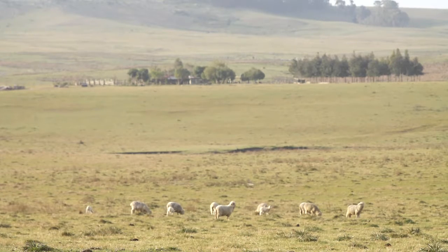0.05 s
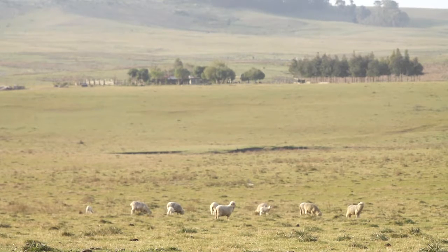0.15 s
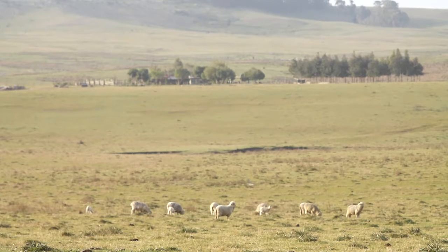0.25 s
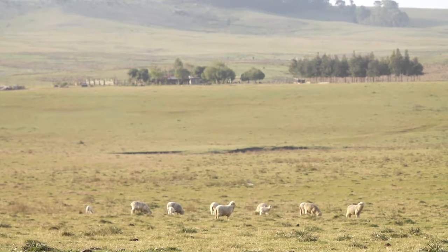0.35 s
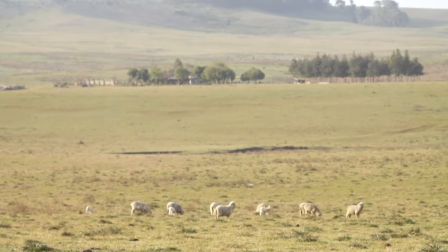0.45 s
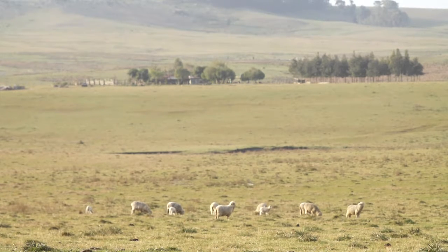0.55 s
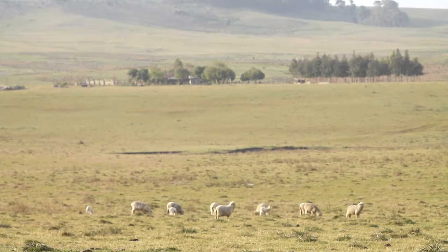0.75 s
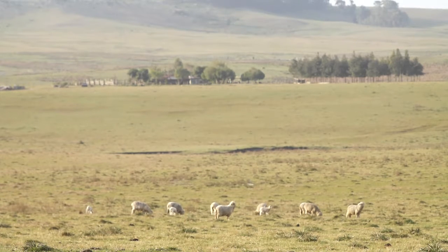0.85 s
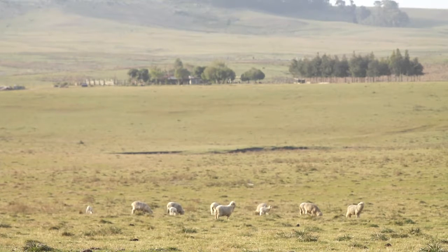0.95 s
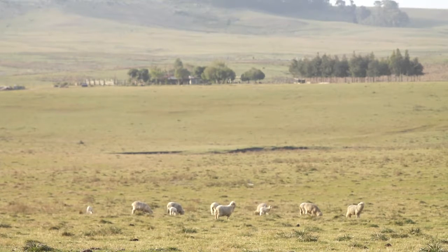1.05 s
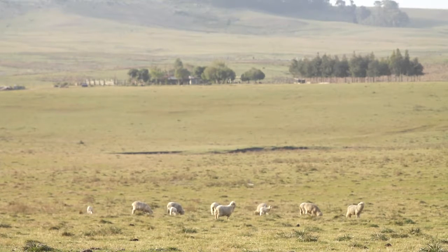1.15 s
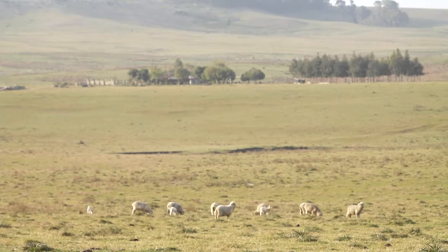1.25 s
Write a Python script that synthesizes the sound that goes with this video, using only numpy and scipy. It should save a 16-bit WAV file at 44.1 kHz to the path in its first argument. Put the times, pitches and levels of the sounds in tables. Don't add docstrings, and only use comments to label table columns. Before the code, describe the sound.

A small fly's low buzz swells quickly at the left microphone, thumps it with air, brushes the grille and vanishes; uneven wind rumble, faint plastic ticks and hiss continue on an open pasture.

```python
import sys
import numpy as np
from scipy import signal
from scipy.fft import rfft, irfft
from scipy.io import wavfile

SR = 44100
rng = np.random.default_rng(int(sys.argv[2]) if len(sys.argv) > 2 else 0)


def store_wav(level_fs):
    pcm = np.round(np.clip(np.atleast_2d(level_fs), -1, 1) * 32767)
    wavfile.write(sys.argv[1], SR, pcm.T.astype(np.int16))


def invert_db(level):
    return 10 ** (np.asarray(level, dtype=float) / 20)


N = 57330


def evened(x):
    return x / np.sqrt(np.mean(x ** 2) + 1e-20)


def shaped(x, points):
    f, db = np.transpose(points)
    hz = np.fft.rfftfreq(x.shape[-1], 1 / SR)
    gain_db = np.interp(np.log(hz + 1), np.log(f), db)
    return irfft(rfft(x) * invert_db(gain_db), x.shape[-1])


def slow(hz, channels=1):
    x = shaped(rng.standard_normal((channels, N)), [(1, 0), (hz, 0), (2 * hz, -60)])
    return x / x.std(1, keepdims=True)


def band(x, hz, width):
    b, a = signal.iirpeak(hz, hz / width, SR)
    return signal.lfilter(b, a, signal.lfilter(b, a, x))


def panned(x, pan_db):
    return np.array([x * invert_db(pan_db / 2), x * invert_db(-pan_db / 2)])


def bump(s, length):
    return np.exp(-.5 * ((np.arange(N) / SR - s) / length) ** 2)


# t/s, level/dB, left over right/dB
GUST_LEVELS = [
    (0, -54, -5),
    (.12, -43.5, 1),
    (.22, -50.5, -1),
    (.36, -40.5, -2),
    (.5, -39, -0.5),
    (.62, -44.5, -11),
    (.8, -39, -4),
    (1.0, -48, -6),
    (1.15, -47.5, 0.5),
    (1.3, -52.5, -9),
]
# f/Hz, level/dB
RUMBLE_SPECTRUM = [(10, -2.5), (22, 2), (40, -3), (63, -11.5), (110, -25.5), (155, -28), (300, -33),
                   (600, -59)]
# f/Hz, level/dB
ROAR_SPECTRUM = [(40, -9.5), (100, 8.5), (200, -8), (400, -12), (800, -19.5), (1600, -20), (3500, -31.5),
                 (9000, -36.5)]
# t/s, length/s, peak level/dB, swing f/Hz, port (0 left, 1 right)
EDDY_HITS = [(0.117, 0.014, -31.5, 29.2, 1), (0.396, 0.0086, -25.5, 39, 1), (0.445, 0.026, -21, 31.9, 1),
             (0.534, 0.019, -23, 24.4, 1), (0.697, 0.023, -30, 37.3, 1), (0.766, 0.024, -24.5, 27, 1),
             (0.827, 0.0079, -21, 44.3, 1), (0.888, 0.0046, -26.5, 50, 1), (0.916, 0.0067, -18, 38.6, 1),
             (1.006, 0.015, -24.5, 40.7, 1), (1.067, 0.014, -25.5, 39.2, 1), (0.425, 0.02, -25, 30.6, 0),
             (0.526, 0.017, -37, 26, 0), (0.677, 0.01, -30.5, 30.8, 0), (0.799, 0.027, -35, 32.2, 0),
             (0.867, 0.014, -36.5, 34.2, 0), (0.952, 0.012, -27, 44.7, 0), (1.127, 0.027, -35, 41.6, 0),
             (0.946, 0.0054, -32, 75, 1), (1.001, 0.006, -35.5, 94, 0), (1.047, 0.0075, -35.5, 70, 0),
             (1.169, 0.014, -39, 49, 0), (1.228, 0.017, -41, 40.5, 0), (.642, .012, -33.5, 39.5, 0)]
# t/s, length/s, level/dB, centre f/Hz, left over right/dB
RUSTLE_EVENTS = [
    (.578, .004, -56, 300, 10),
    (.612, .006, -51, 380, 10),
    (.664, .008, -54, 2400, -2),
    (.71, .025, -54, 600, -1),
    (.68, .03, -58, 350, -1),
    (.40, .04, -59, 500, 0),
    (.53, .04, -60, 350, -2),
    (.12, .05, -60, 1300, 0),
    (1.24, .025, -54, 500, -2),
    (1.25, .02, -57, 1400, -2),
]
LUMPS_DB = 1
ROAR_DB, ROAR_FOLLOWS = -51.5, 0.2
RUSTLE_DB = -0.9


def wind():
    t = np.arange(N) / SR
    gust_s, gust_db, gust_pan_db = np.transpose(GUST_LEVELS)
    db, pan_db = np.interp(t, gust_s, gust_db), np.interp(t, gust_s, gust_pan_db)
    rumble_noise, roar_noise, rustle_noise = rng.standard_normal((3, 2, N))

    lumpy = rumble_noise * invert_db(LUMPS_DB * slow(40, channels=2))
    out = evened(shaped(lumpy, RUMBLE_SPECTRUM)) * panned(invert_db(db + 4.0), pan_db)
    for s, length, peak_db, hz, port in EDDY_HITS:
        out[round(port)] -= invert_db(peak_db) * bump(s, length) * np.cos(2 * np.pi * hz * (t - s))

    roar = evened(shaped(roar_noise + 0.19 * roar_noise[::-1], ROAR_SPECTRUM))
    out += roar * invert_db(ROAR_DB + ROAR_FOLLOWS * (db + 40) + 1.5 * slow(9))

    for s, length, level_db, hz, side_db in RUSTLE_EVENTS:
        rustle = band(rustle_noise, hz, 1.37 * hz) * bump(s, length)
        rustle *= np.sqrt(length * SR * 1.8 / (rustle ** 2).sum(1, keepdims=True))
        out += rustle * panned(invert_db(level_db + RUSTLE_DB) * np.ones(1), side_db)
    return out


# t/s, then snap, low ring, high ring and boom level/dB
TICK_EVENTS = [(.1016, -45, -51, -46.5, -37.5), (0.1123, -50.5, -60, -58, -55), (.1243, -69, -58, -68, -70),
               (.1443, -66, -51, -63, -70), (.236, -44.5, -46, -50, -31), (0.298, -60, -47, -66, -44),
               (.358, -68, -53.5, -66, -42.5), (.399, -68, -54, -66, -46.5),
               (.6552, -41.5, -50.5, -45, -57), (0.6587, -50.5, -57, -49, -70),
               (0.6639, -48, -45.5, -58, -51), (.681, -61, -58, -66, -68), (0.6986, -53, -55, -53, -53),
               (.7025, -58, -49, -62, -70), (.711, -62, -62, -66, -70), (.721, -61, -55, -62, -65),
               (.738, -64, -56.5, -64, -68)]
# f/Hz, level/dB
SNAP_SPECTRUM = [(300, -16), (1200, 9), (2800, 0.5), (6000, -9), (13000, -7), (15600, -5)]
# f/Hz, level/dB, T60/s
LOW_MODES = [(1420, -1, .11), (1465, -5, .06), (1330, -6, .03), (1800, -7, .04), (2010, -7, .04),
             (684, -2, .05), (950, -7, .03)]
# f/Hz, level/dB, T60/s
HIGH_MODES = [(2550, -6, .02), (3150, -1, .014), (3900, -7, .01), (4850, 0, .012), (7300, -6, .01)]
SNAP_T60, BOOM_T60, BOOM_HZ = 0.021, 0.23, 124.2
DETUNE = .008
TICK_PAN_DB, TICK_SAME = -2.2, .7


def housing():
    length = 12000
    out, t = np.zeros((2, N + length)), np.arange(length) / SR
    for s, snap_db, low_db, high_db, boom_db in TICK_EVENTS:
        noise = rng.standard_normal((2, length))
        snap = shaped(noise + TICK_SAME * noise[::-1], SNAP_SPECTRUM) * invert_db(-60 * t / SNAP_T60)
        snap *= invert_db(snap_db) / snap[:, :100].std(1, keepdims=True)

        ring = np.zeros((2, length))
        for level_db, modes in [(low_db, LOW_MODES), (high_db, HIGH_MODES)]:
            for hz, db, t60 in modes:
                mode_hz = hz * (1 + DETUNE * rng.standard_normal())
                start_turn = rng.random((2, 1)) / 4
                ring += invert_db(level_db + db - 60 * t / t60) * np.sin(2 * np.pi * (mode_hz * t + start_turn))

        boom = invert_db(boom_db - 60 * t / BOOM_T60) * np.sin(2 * np.pi * BOOM_HZ * t)
        boom *= np.minimum(t / .008, 1)
        onset = np.minimum(t / 0.00057, 1)
        at = round(s * SR)
        out[:, at:at + length] += (snap + ring + boom) * onset * panned(np.ones(1), TICK_PAN_DB)
    return out[:, :N]


TAP_LEVELS = [
    -37,
    -35,
    -37,
    -40,
    -37.5,
]
BRUSH_S, BRUSH_PER_S, BRUSH_T60 = .4003, 177.5, 0.0036


def brush():
    out, t = np.zeros((2, N)), np.arange(300) / SR
    for k, db in enumerate(TAP_LEVELS):
        at = round((BRUSH_S + k / BRUSH_PER_S) * SR)
        out[0, at:at + 300] += invert_db(db - 60 * t / BRUSH_T60) * band(rng.standard_normal(300), 7400, 18000)
    return out


# t/s, wingbeat f/Hz, level/dB, left over right/dB, overtones/dB
FLIGHT_PATH = [
    (0, 204.9, -57, 4.5, -0.5),
    (0.069, 189.7, -57, 10.5, 1.5),
    (0.148, 186.7, -52.5, 13.5, 2.5),
    (0.201, 179.6, -41, 23, -4),
    (0.223, 183.9, -28.5, 30, -8.5),
    (0.259, 187.1, -24.5, 42, 8.5),
    (0.285, 183.7, -25.5, 34, 7),
    (0.296, 185.6, -19.5, 34, -6),
    (0.32, 177.5, -28, 43, -4),
]
# partial number, level/dB
WING_PARTIALS = [(1, 0), (2, -6.5), (3, -11), (4, -15), (5, -15), (6, -18), (7, -22), (8, -22), (9, -28),
                 (10, -29), (11, -30), (12, -34), (13, -36), (14, -38), (15, -38), (16, -40), (17, -41),
                 (18, -43), (19, -45)]
FAR_PARTIALS_DB = {2: 2.5, 3: -2, 6: 2, 7: -5, 9: -4, 10: -3, 12: -3, 13: -3}
# t/s, level/dB
SIDE_ON_EVEN = [(0, -6), (.05, -13), (.085, 0)]
# t/s, length/s, level/dB
STROKE_SWERVES = [
    (.3028, .0018, -6),
    (.3083, .0016, 4),
    (.268, .004, -2.5),
    (.2465, .002, -2.5),
]
# t/s, length/s, level/dB, f/Hz
PORT_PULSES = [(0.26, 0.0097, -18, 39), (.2505, 0.0045, -11.5, 133.5), (.2578, 0.00072, -12.5, 595),
               (0.24, 0.00043, -22, 1060), (.307, 0.0073, -25, 272), (.303, 0.017, -29, 95),
               (.3085, 0.0011, -13.5, 220), (.3, 0.00086, -16, 240), (.313, 0.0024, -40, 2700),
               (.292, .001, -53, 2600), (.32, 0.0023, -36, 200), (.238, .003, -45.5, 3800),
               (.297, 0.0075, -28, 72)]
PASS_S, PASS_WIDTH_S = .254, 0.0046
TURN_S, TURN_WIDTH_S = .188, 0.016
CLOSE_DB, CLOSE_SLOPE = -26, 1.13
LEAVE_DB_PER_S = 2598
STROKE_S, STROKE_DB, WOBBLE = .2815, 6, .005
LEAN_BEFORE, LEAN_AFTER = .45, .15
SHIMMER_DB, NEAR_DULL_DB = 2, -8.5
HOLLOW_S, HOLLOW_LENGTH_S, HOLLOW_DB = .3, .011, -8
SWIRL_DB, SWIRL_HZ, FLICK_DB, FLICK_SPREAD_DB = -28, 596, -54.5, 2.5
PUFF, PUFF_BED, FLICK, FLICK_BED = .28, .4, .1, .25


def fly():
    t, rows = np.arange(N) / SR, np.transpose(FLIGHT_PATH)
    hz, db, pan_db, tilt_db = (np.interp(t, rows[0], r) for r in rows[1:])
    db = db - LEAVE_DB_PER_S * np.maximum(t - rows[0][-1], 0)
    close = invert_db(CLOSE_SLOPE * (db - CLOSE_DB))

    turns = np.cumsum(hz * (1 + WOBBLE * slow(79)[0])) / SR
    turns += 100 - turns[round(STROKE_S * SR)]
    past = np.tanh((t - PASS_S) / PASS_WIDTH_S)
    turns += .5 * (past < 0)
    lean = np.where(past < 0, LEAN_BEFORE, LEAN_AFTER)
    far = np.pi / 2 * (1 - np.tanh((t - TURN_S) / TURN_WIDTH_S))

    shimmer = slow(45, channels=14) * np.minimum(close + .6, 1)
    shimmer = np.resize(shimmer, (len(WING_PARTIALS), N))
    hollow_db = HOLLOW_DB * bump(HOLLOW_S, HOLLOW_LENGTH_S)
    even_db = np.interp(t, *np.transpose(SIDE_ON_EVEN))
    dull_db = NEAR_DULL_DB * np.clip(2 * close, 0, 1)
    tone = np.zeros(N)
    for (k, partial_db), waver in zip(WING_PARTIALS, shimmer):
        even = k % 2 == 0
        level_db = partial_db + tilt_db * min((k - 1) / 2, 1) + SHIMMER_DB * waver
        level_db = level_db + dull_db * np.clip(np.log2(k / 3.87), 0, 1.4)
        level_db = level_db + even_db * even + hollow_db * (k == 3)
        level_db = level_db + FAR_PARTIALS_DB.get(k, 0) * far / np.pi
        tone += invert_db(level_db) * np.cos(2 * np.pi * k * turns + lean * np.sqrt(k) + far * even)
    swerve_db = sum(d * bump(s, length) for s, length, d in STROKE_SWERVES)
    tone *= np.sqrt(2) * invert_db(db + STROKE_DB + swerve_db) * past

    puffs = rng.standard_normal(N) * (PUFF_BED + np.exp(-(turns % 1) / PUFF))
    swirl = evened(shaped(puffs, [(40, -8), (140, 0), (280, -1), (SWIRL_HZ, -2), (1500, -17),
                                  (4000, -35), (16000, -55)]))
    size = invert_db(FLICK_SPREAD_DB * rng.standard_normal(400))[turns.astype(int)]
    flicks = rng.standard_normal(N) * (FLICK_BED + size * np.exp(-(turns % 1) / FLICK))
    flick = evened(shaped(flicks, [(1000, -38), (2500, -4.5), (6000, -2.5), (14000, -2.0), (15500, -23)]))
    flick_db = FLICK_DB + 8.7 * bump(.3135, 0.0036)
    near = close * (invert_db(SWIRL_DB) * swirl + invert_db(flick_db) * flick)
    for s, length, push_db, push_hz in PORT_PULSES:
        near += invert_db(push_db) * bump(s, length) * np.cos(2 * np.pi * push_hz * (t - s))
    return np.array([tone + near, tone * invert_db(-pan_db)])


def scene():
    return wind() + housing() + brush() + fly()


def low_pass(x):
    return signal.sosfilt(signal.butter(12, 15690, fs=SR, output="sos"), x)


# f/Hz, level/dB
HISS_SPECTRUM = [(100, 15.5), (2000, 4.5), (6000, 0.76), (12000, -1), (15000, -3)]
# f/Hz, gain/dB
BAND_EDGE = [(10, 0), (15000, 0), (15120, -30), (15700, -32), (15900, -70)]
HISS_DB = -56


def record(dry):
    hiss = invert_db(HISS_DB) * evened(shaped(rng.standard_normal((2, N)), HISS_SPECTRUM))
    mix = shaped(dry + hiss, BAND_EDGE)
    return low_pass(mix)


dry = scene()
out = record(dry)
store_wav(out)
```